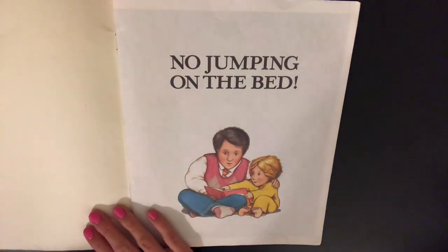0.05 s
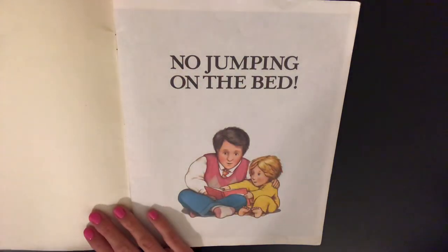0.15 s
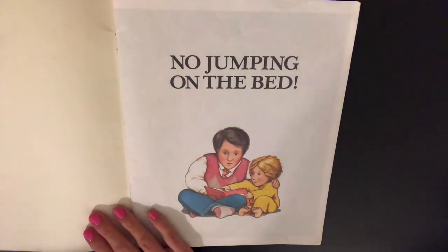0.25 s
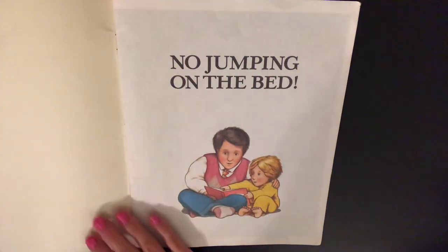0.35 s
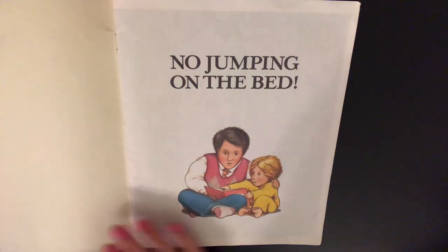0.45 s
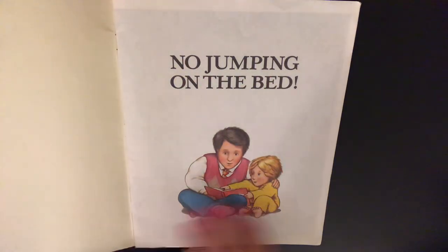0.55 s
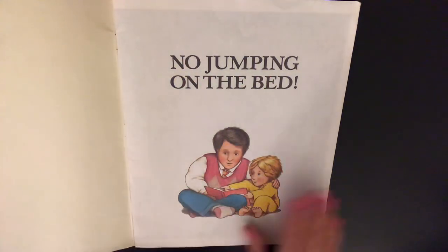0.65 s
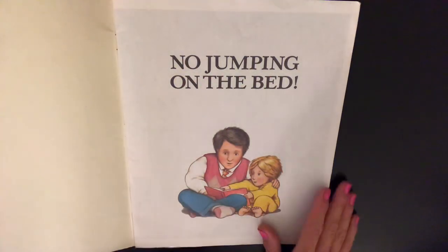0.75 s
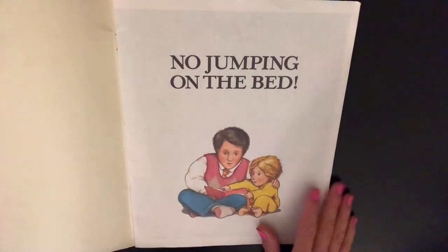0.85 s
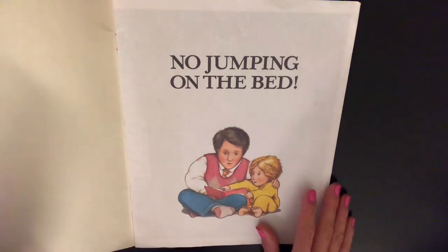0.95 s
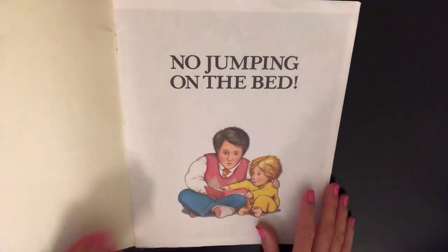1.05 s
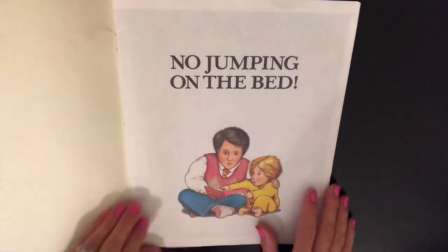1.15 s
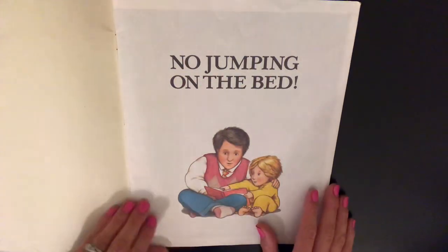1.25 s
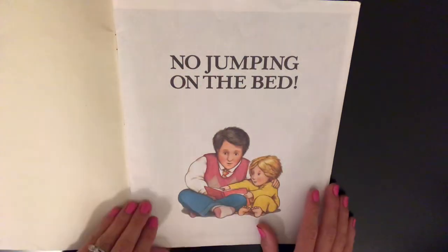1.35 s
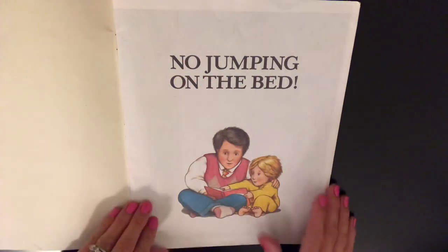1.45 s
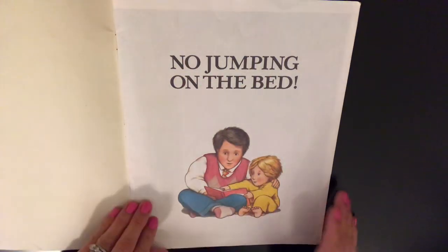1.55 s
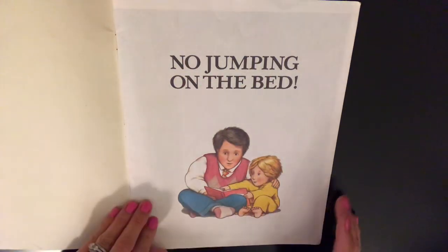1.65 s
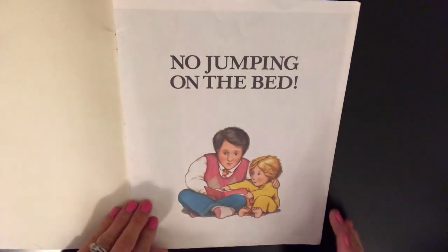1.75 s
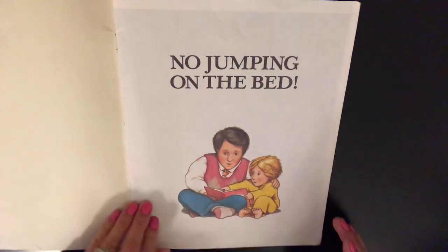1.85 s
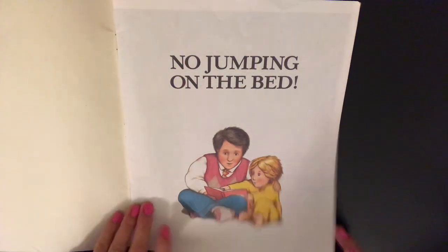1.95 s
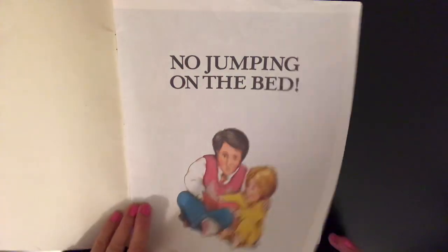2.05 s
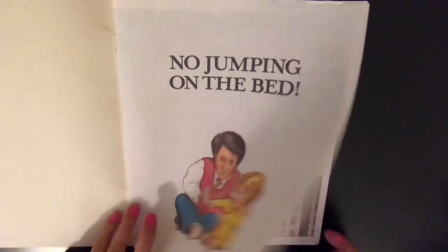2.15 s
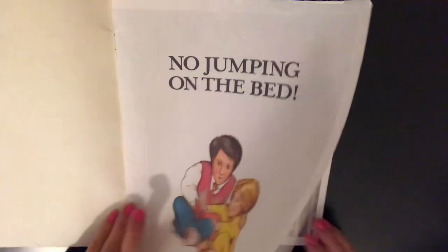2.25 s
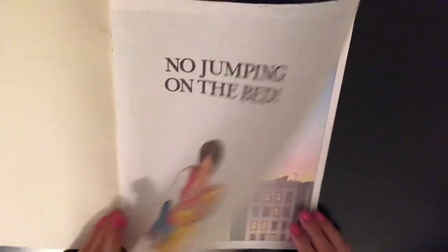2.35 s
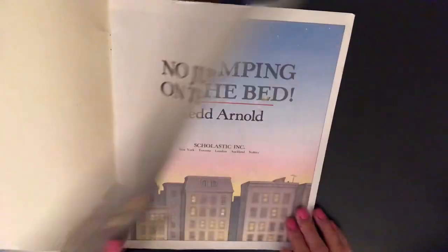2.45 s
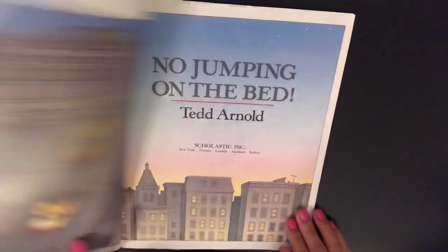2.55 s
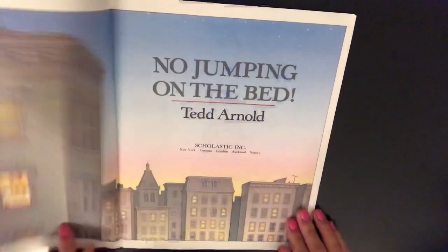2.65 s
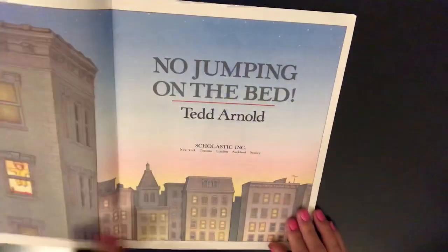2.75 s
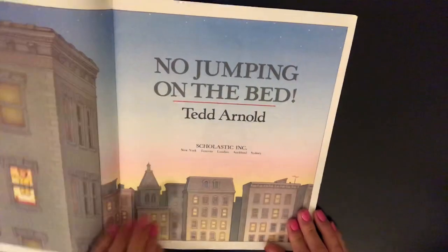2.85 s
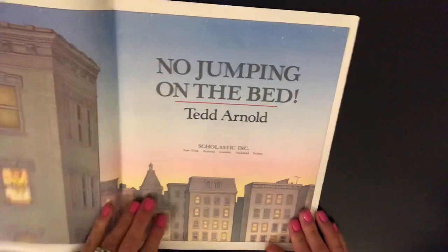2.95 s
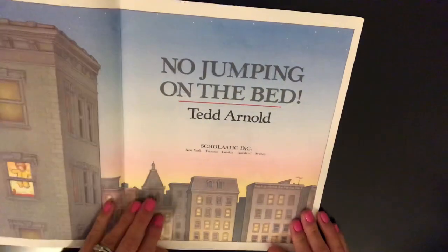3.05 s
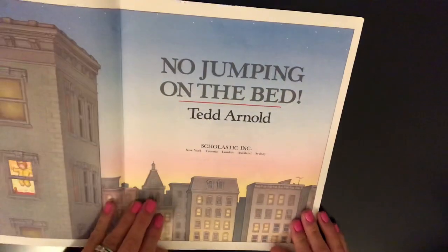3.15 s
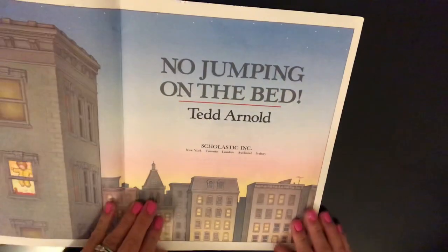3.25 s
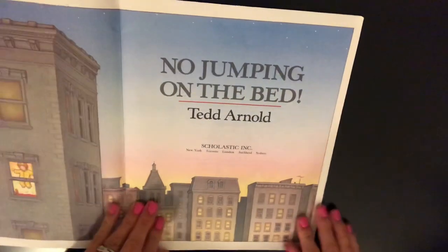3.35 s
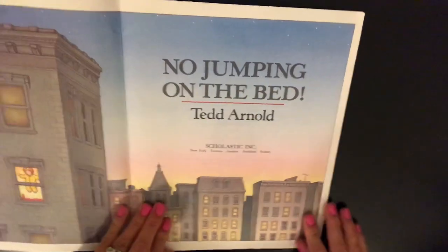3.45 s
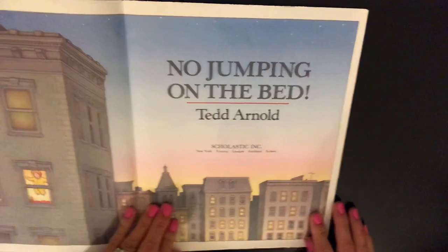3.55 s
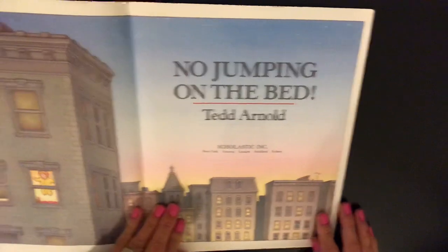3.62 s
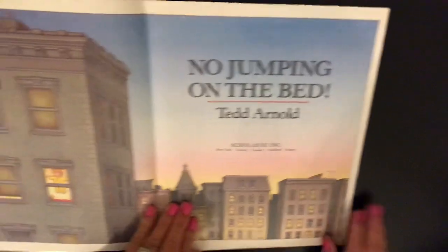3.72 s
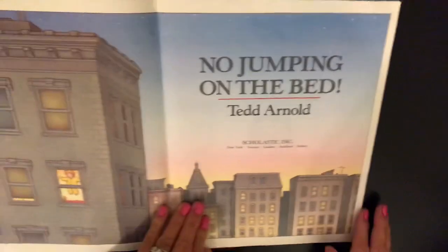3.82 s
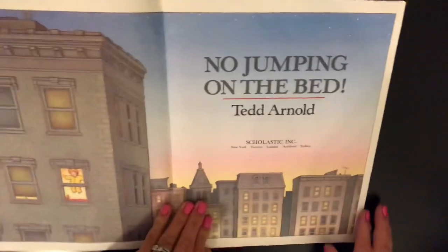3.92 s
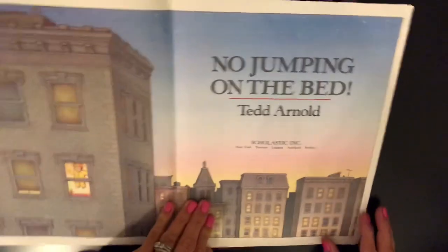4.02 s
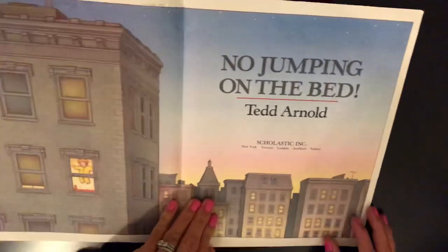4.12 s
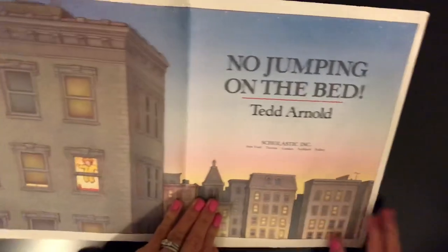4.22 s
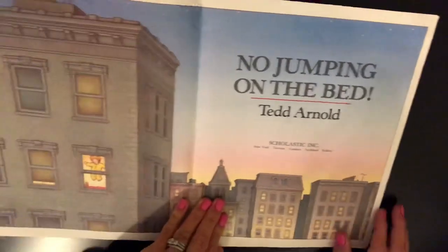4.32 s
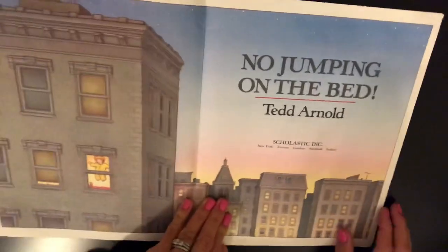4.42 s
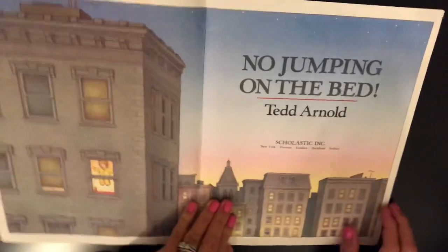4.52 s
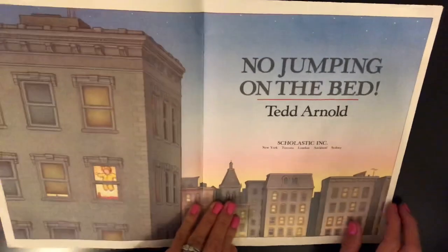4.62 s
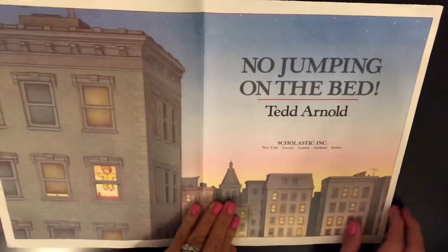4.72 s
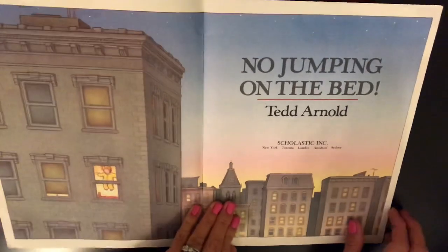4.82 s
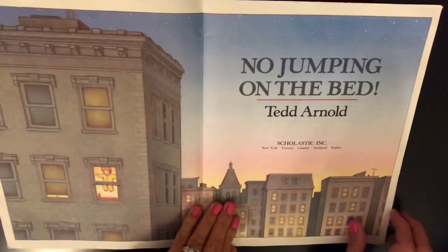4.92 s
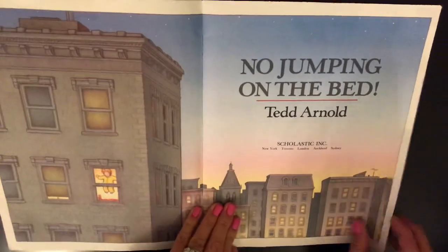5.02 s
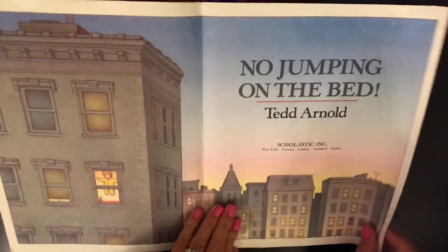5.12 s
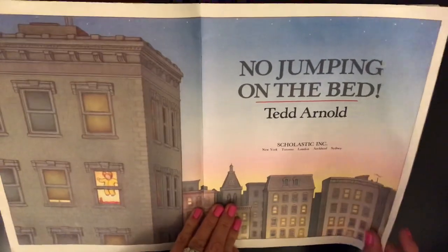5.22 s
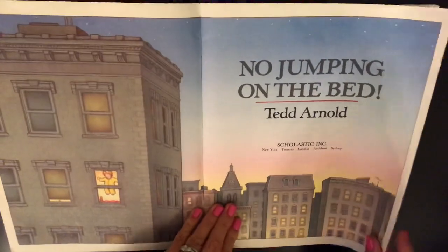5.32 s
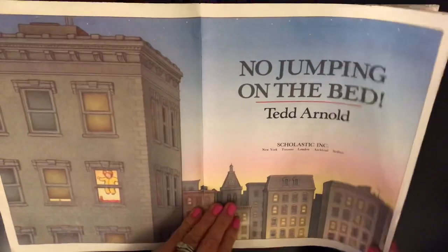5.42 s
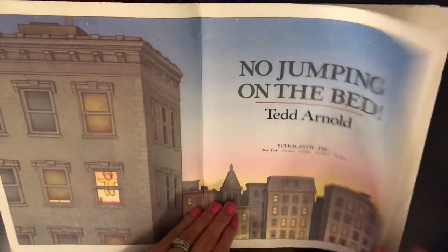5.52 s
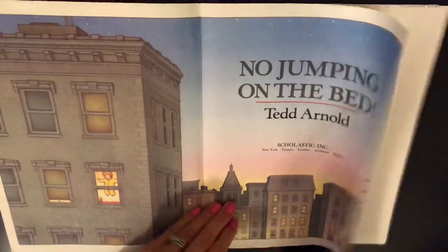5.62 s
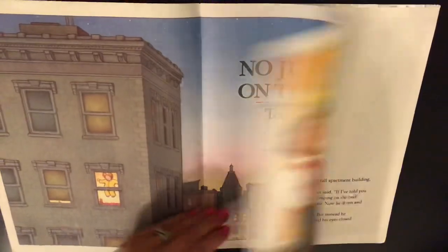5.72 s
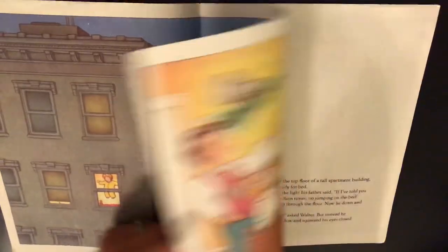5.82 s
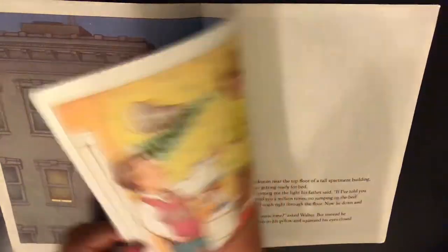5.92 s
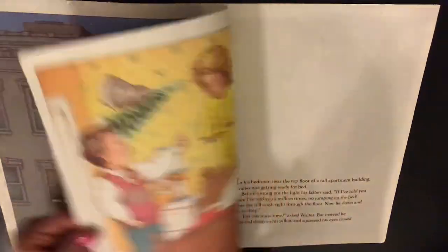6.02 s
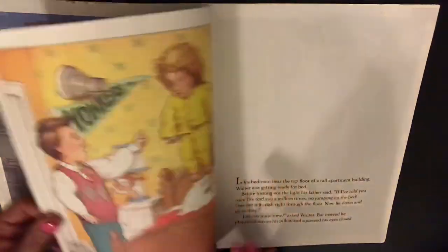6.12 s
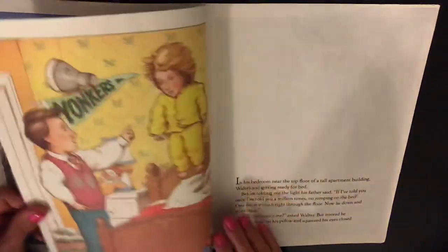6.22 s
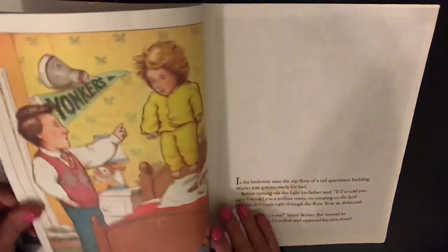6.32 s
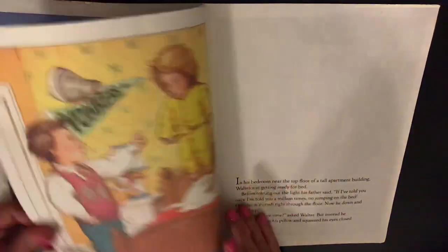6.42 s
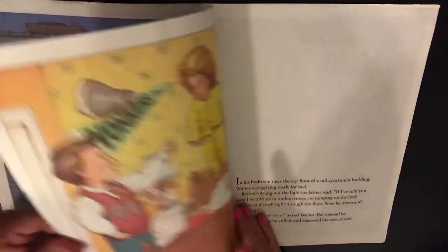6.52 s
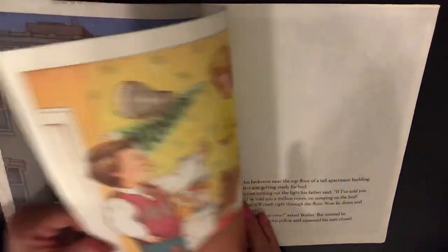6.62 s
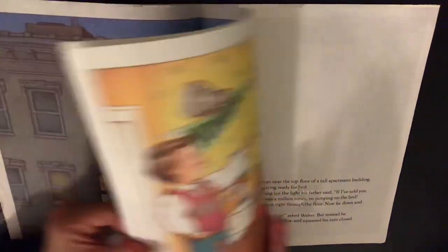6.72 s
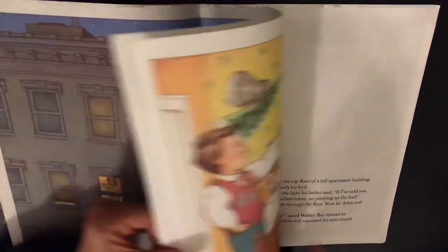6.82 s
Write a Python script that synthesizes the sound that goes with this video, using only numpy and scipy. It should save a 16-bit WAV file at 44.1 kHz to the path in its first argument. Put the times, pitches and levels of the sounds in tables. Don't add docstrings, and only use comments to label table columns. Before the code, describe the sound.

Close-up page turning in a quiet room: low table thump, papery scrapes and sliding rubs, crisp crackling folds, and a sharp final pop.

```python
import sys
import numpy as np
from scipy import signal
from scipy.fft import rfft, irfft, next_fast_len
from scipy.io import wavfile
from scipy.ndimage import uniform_filter1d, map_coordinates

SR = 44100
rng = np.random.default_rng(int(sys.argv[2]) if len(sys.argv) > 2 else 0)


def gain_from_db(level_db):
    decades = np.asarray(level_db, float) / 20
    return 10 ** decades


def store_wav(level_fs):
    pcm = np.round(np.clip(np.atleast_2d(level_fs), -1, 1) * 32767)
    wavfile.write(sys.argv[1], SR, pcm.T.astype(np.int16))


N = 302967

# f/Hz, level/dB per Hz
AIR = [(15, -52), (25, -30), (47, -6), (102, -8), (200, -14), (384, -14), (575, -24.5), (1020, -28.5),
       (2480, -32.5), (4870, -39), (5730, -37.5), (9000, -44), (14400, -45.5), (16000, -50)]
AIR_DB = -59
# f/Hz, level/dB
HUM = [(38.3, -91), (76.6, -59), (114.9, -62.5), (153.2, -71.5), (229.8, -73.5), (268, -75), (306.4, -77.5)]
HUM_SWAY_DB = 1.3
# f/Hz, time to fall 60 dB/s
WALLS = [(200, 1), (2000, 0.15), (10000, 0.26)]
# f/Hz, level/dB
MIC = [(9000, 0), (10400, -2), (11500, 1.5), (15700, 1.5), (15950, -43.5)]

# t/s, peak level/dB, f/Hz, time to fall 60 dB/s
THUMPS = [(.682, -36, 102, 0.44), (.71, -33, 64, 0.143), (.728, -30, 97, 0.1), (.69, -46.5, 184, 0.41),
          (.748, -32, 87, 0.087), (.786, -28, 87, 0.13), (.87, -38, 81.8, 0.3), (.9, -35, 84.5, .3),
          (.815, -32, 83.7, 0.11), (2.11, -49, 134, 0.54), (2.64, -48, 107.6, 0.45), (5.93, -47, 56.3, .3),
          (6.27, -48, 50.3, 0.27)]
# f/Hz, level/dB, time to fall 60 dB/s
KNOCK = [(291, 2, 0.072), (435, -16, 0.12), (675, -7, 0.15), (850, -12, 0.055), (3340, -9, 0.026)]
KNOCK_S, KNOCK_DB = .725, -38

# f/Hz, level/dB per Hz
BODY = [(400, -39), (700, -19), (1000, -4.5), (1250, -2.5), (1400, 2), (1550, -1.5), (1800, 2), (2080, -12),
        (2350, -30), (2700, -28), (3400, -57), (5700, -120)]
# f/Hz, level/dB per Hz
RUB = [(1180, -51), (2000, -5), (2150, -5.5), (2330, -1.5), (2910, -5), (4150, -4), (4820, -8), (6110, -10),
       (7500, -16.5), (9750, -63), (16500, -120)]
# f/Hz, level/dB per Hz
SIZZLE = [(4000, -10.5), (6500, 0.5), (8000, -5), (11000, -8.5), (16000, -16)]
# f/Hz, width/Hz, level/dB
COVER = [(1430, 100, 3), (2350, 130, -9), (3520, 87, -12), (5920, 940, -10.5)]
COVER_DB = -4
# peak t/s, rise/s, fall/s, paper rub level/dB, body over the rub level/dB
DRAGS = [(3.3, 0.055, 0.11, -57.5, -15), (3.44, 0.12, 0.28, -54.5, 0.5), (3.65, 0.14, 0.16, -48, -3),
         (3.77, 0.11, 0.085, -49.5, -3), (4.06, .13, .06, -54, -1), (3.85, .04, .09, -60, 3),
         (3.95, .06, .07, -63, 0), (4.15, .06, .06, -66, 2), (4.62, .04, .07, -70, 0),
         (4.03, .05, .05, -58, 0), (3.73, .04, .04, -52, 0), (4.21, 0.077, 0.141, -55, -2.5),
         (4.31, 0.11, 0.16, -55.5, -1), (4.53, 0.11, 0.089, -53, -4.5), (4.585, 0.091, 0.033, -64, 5)]
FIRST_PAGE = [(.685, 0.013, 0.13, -66.5, 0.5), (1.135, 0.014, 0.029, -70, 13), (1.18, .05, 0.32, -65, 0),
              (1.95, 0.12, .05, -71, 6), (2.078, 0.095, 0.033, -49, -6.5), (2.12, .04, 0.077, -71, 12),
              (2.2, 0.055, 0.38, -54, -2.5), (2.55, 0.17, .07, -56, -8), (2.694, 0.088, 0.15, -47, 2.5),
              (2.79, 0.1, 0.14, -57, -5), (2.988, 0.15, 0.0524, -58.5, 3)]
SECOND_PAGE = [(4.73, 0.021, 0.36, -90.5, 18), (5.07, .1, 0.14, -56, -4.5), (5.15, .05, 0.089, -59.5, -7.5),
               (5.29, 0.077, 0.094, -56, -1), (5.42, 0.14, 0.1, -39, -4.5), (5.55, .07, 0.18, -48, -9.5),
               (5.71, 0.18, 0.2, -51.5, -4), (5.86, 0.18, 0.176, -52.5, -12),
               (6.22, 0.37, 0.19, -60.5, -1.5), (6.4, 0.21, 0.155, -81, 20), (6.56, 0.068, .06, -59, 2.5),
               (6.62, 0.048, .1, -47, -9), (6.71, 0.062, .09, -47.5, -3.5), (6.8, .06, 0.11, -56.5, -5)]
EDGE_DB, LIFT_S = -12.5, 0.05
DRAG_SIZZLE_DB, FIRST_SIZZLE_DB, SECOND_SIZZLE_DB = -7.5, -4.5, -11.5

# t/s, length/s, level/dB, centre f/Hz
BRUSHES = [(1.2, .18, -67, 2200), (.76, .06, -68, 2000), (1.035, .012, -66, 3000), (2.03, .05, -54, 6000),
           (2.903, .016, -52, 4500), (4.787, .008, -64, 2500), (4.84, .03, -71, 2000),
           (6.015, .033, -52.5, 3540), (6.256, .042, -59, 6300), (6.318, .03, -61, 5500),
           (2.532, .022, -47, 2600), (6.415, .012, -52, 4200), (6.353, .012, -54.5, 4800),
           (6.405, .009, -54, 4000), (6.555, .01, -56, 4000)]
CATCHES = [(4.799, .025, -64, 2600), (2.43, .1, -60, 8000), (5.012, .03, -62, 6500),
           (6.022, .025, -61, 8000), (2.612, .012, -52, 3500), (.67, 0.064, -61, 7400),
           (.86, 0.0177, -67, 4540), (.973, 0.013, -68, 2160), (1.118, 0.081, -62.5, 4960),
           (1.815, .14, -71.5, 3430), (2.197, 0.054, -45.5, 6740), (2.29, 0.0856, -55.5, 5000),
           (4.934, .03, -69, 3500), (5.04, 0.064, -51, 4900), (5.158, 0.051, -48, 3540),
           (5.66, 0.14, -50, 4320)]
SWEEPS = [(1.25, 0.03, -66, 4600), (1.94, 0.0072, -52, 4230), (2.025, 0.063, -53, 4130),
          (2.078, 0.027, -46, 5500), (2.531, 0.024, -44, 5160), (2.198, 0.08, -47, 4580),
          (2.619, 0.011, -40.5, 3400), (2.726, .052, -40.5, 4850), (2.946, 0.12, -67.5, 3000),
          (5.115, .036, -56.5, 5400), (5.285, 0.093, -40.5, 4400), (6.572, 0.095, -44, 5650),
          (6.578, .03, -54, 5000), (6.67, 0.055, -51, 4130)]
ZIPS = [(5.355, .005, -38, 9000), (5.292, .05, -54, 9500), (5.77, .09, -64, 12000), (5.83, .05, -62, 8500),
        (5.928, .008, -60, 12500), (5.9, .08, -66, 11500), (6.256, .008, -69, 12000),
        (.085, .006, -51, 12000), (3.66, .06, -58.5, 6400), (4.2, .1, -65, 6200), (1.25, .01, -68, 11500),
        (3.187, .006, -67, 14000), (3.331, .015, -58.5, 7500), (3.41, .016, -59.5, 9500),
        (5.36, 0.09, -45, 4300), (5.39, 0.045, -42, 3000), (5.91, 0.082, -50.5, 3670),
        (5.95, 0.028, -57, 7960), (6.7245, 0.016, -29.5, 5200), (6.74, 0.028, -34, 5100),
        (6.755, 0.024, -37.5, 4100)]
WHISTLES = [
    (5.455, .06, -43, 3380),
    (6.642, 0.023, -39, 4970),
]
PUFFS = [(2.78, .05, -56, 650), (2.96, .07, -64, 650), (5.19, .06, -66, 750), (5.51, .04, -64, 650),
         (5.6, .07, -65, 750), (6.33, .03, -60, 650), (6.47, .07, -57, 600), (6.68, .04, -61, 650),
         (6.78, .06, -57, 650), (2.628, .025, -47, 780), (2.27, 0.057, -59, 300), (2.74, 0.055, -57, 330),
         (2.1, 0.045, -51.5, 230), (2.53, 0.069, -59, 400), (2.63, 0.086, -49, 415),
         (5.92, 0.16, -56.5, 410), (6.22, 0.16, -65, 706), (6.411, 0.069, -47.5, 340),
         (6.854, 0.02, -52, 318)]
SLAPS = [(.725, 0.022, -52, 500), (1.913, 0.02, -52.5, 1100), (2.13, 0.033, -42.5, 1300),
         (2.252, 0.026, -41.5, 1220), (2.56, 0.04, -51, 1330), (2.65, 0.034, -32, 1310),
         (2.69, 0.044, -52, 1270), (5.8, 0.012, -43, 1330), (5.822, 0.028, -41.5, 1190),
         (6.376, 0.1, -50.5, 890), (6.556, 0.014, -48, 900), (6.726, 0.062, -45.5, 1900),
         (6.858, .015, -42, 1000)]
FLUTTERS = [(1.948, 0.015, -37.5, 1420), (1.96, 0.014, -49, 1220), (2.275, 0.033, -44.5, 1060),
            (2.752, 0.039, -39, 1100), (2.918, 0.014, -45, 1000), (5.915, 0.04, -47, 1100),
            (5.957, 0.026, -47, 1050), (6.006, 0.041, -47, 890), (6.414, 0.015, -34, 1410),
            (6.43, 0.032, -42, 850), (6.67, 0.023, -57, 1320)]
BUCKLES = [
    (2.078, 0.031, -43, 1800),
    (2.111, 0.015, -34, 1270),
    (2.628, 0.019, -37, 1300),
    (6.6, 0.0736, -50, 650),
]
SQUEAKS = [(2.982, .022, -52, 1150), (2.535, .015, -49, 1300), (1.97, 0.033, -56, 1500),
           (3.3, .14, -66, 1400), (3.845, .05, -60, 1350), (5.19, .04, -58, 1100), (4.22, 0.11, -61, 1500),
           (4.47, 0.13, -60.5, 1500), (3.625, 0.044, -45.5, 1200), (3.665, 0.046, -49, 1510),
           (3.747, 0.021, -40, 1420), (5.428, 0.016, -40, 1500)]
BRUSH, CATCH, SWEEP = (.7, .5), (0.99, 0.29), (0.84, 0.73)
ZIP, WHISTLE, PUFF = (0.32, 0.3), (0.46, 0.84), (0.26, 0.38)
SLAP, FLUTTER, BUCKLE, SQUEAK = (0.91, 0.042), (0.49, 0.58), (0.67, 0.79), (0.14, 0.57)
SCRAPE_COMB_DB = 3.2

# t/s, peak level/dB, ring f/Hz, ring length/cycles
SNAPS = [(.722, -35, 830, 0.69), (1.119, -44, 1630, 2.1), (1.638, -42, 1550, 1.4), (.0856, -47, 1300, .8),
         (2.626, -35, 1230, 1.3), (2.765, -26.5, 1160, 2.4), (2.904, -36, 1110, 1.2),
         (3.2632, -22, 1690, 2), (3.2638, -21, 1450, 1.1), (3.2631, -30, 4200, .9),
         (6.855, -16.5, 935, 0.51)]
TICKS = [
    (.0854, -29, 5930, 1),
    (1.496, -55, 4320, 2.2),
    (1.9624, -34, 2670, 1.5),
    (2.2497, -21, 3650, 0.9),
    (2.6247, -25.5, 3200, 0.99),
    (1.639, -49, 5500, 1.5),
    (5.4076, -28, 3740, 1.7),
    (5.5005, -35, 2880, 2.8),
]
REBOUND = [
    (5.3551, -2, 3700, .8),
    (5.35668, -1.5, 2900, .6),
    (5.3556, -15, 1500, .9),
    (6.8547, -25, 1500, 1.1),
]
CRACKLE = [
    (2.147, -33.5, 1537, 1.8),
    (2.284, -32, 1700, 1.6),
    (2.632, -28, 1230, 1.2),
    (2.6415, -24, 1200, .8),
    (2.655, -18, 1020, .84),
    (2.6645, -24, 1243, 1.2),
    (3.751, -37, 1390, 1.1),
    (5.527, -36, 2810, 1.24),
]
MUFFLED = [(2.2525, -28.5, 2700, 1.1), (1.9515, -31.5, 1246, 1.9), (2.1165, -21, 1110, .8),
           (2.65, -21, 1200, 1.1), (2.9175, -29, 1500, 0.62), (5.8217, -27, 1240, 1.1),
           (6.014, -35, 1340, 2.1), (6.558, -37, 800, 0.84), (2.9178, -26.5, 3530, 1.3),
           (5.505, -35, 1100, 0.4), (5.637, -29, 1430, 0.38), (5.7985, -16.5, 1320, 0.66),
           (6.3745, -29.5, 800, 0.42), (6.3742, -28.5, 2730, 0.64), (6.4158, -22, 1900, 0.49),
           (6.4212, -19, 850, 0.64), (6.727, -33.5, 600, 0.42), (6.44, -39, 800, 2),
           (6.4513, -37, 774, 1.1)]
PINGS = [
    (.284, -44, 1610, 1.6),
    (5.556, -33, 2650, 4),
    (6.179, -48, 1760, 5.1),
]
# t/s, peak level/dB, ring f/Hz
FOLDS = [(1.9665, -36, 1300), (2.1035, -34.5, 600), (2.2805, -37.5, 454), (2.123, -32, 1050),
         (5.8222, -28, 2400), (6.408, -38, 895), (6.4162, -29, 3500), (6.4195, -29, 2700),
         (2.0975, -37, 1400), (2.1195, -24, 1520), (2.136, -30, 1090), (2.6685, -25, 1360),
         (2.672, -28, 1120), (2.678, -33, 1460), (2.6885, -36, 1600), (2.6935, -33, 950),
         (2.7095, -32, 1700), (2.752, -33, 1120), (2.761, -30, 970), (2.773, -34, 1050), (2.7775, -31, 970),
         (5.8265, -29, 1740), (5.8315, -36, 820), (5.9233, -37, 1310), (5.926, -39, 1400),
         (5.929, -36, 836), (5.94, -43, 1090), (5.947, -32, 1270), (5.9605, -40, 790), (5.965, -33, 730),
         (5.9822, -39, 686), (6.0115, -36, 730), (6.023, -35.5, 614), (6.05, -40, 775), (6.381, -37, 795),
         (6.392, -32, 840), (6.3995, -35, 730), (6.4175, -25, 1530), (6.425, -26, 2100), (6.4275, -28, 930),
         (6.4345, -30, 800), (6.4375, -32, 1120), (6.4455, -32, 1090), (6.448, -28, 745),
         (6.5565, -32, 664)]
FIBRES = [(2.652, -20, 3420), (2.6573, -26, 2400), (2.6658, -27, 2370), (2.7462, -28, 2840),
          (2.7623, -35, 4590), (5.3055, -35, 3700), (5.3266, -29, 5860), (5.3225, -29, 3800),
          (5.332, -29, 2300), (5.3458, -26, 3660), (5.3666, -30, 4400), (5.3769, -29, 3040),
          (5.3838, -26, 4200), (5.3998, -28, 4330), (5.417, -31, 3360), (5.4208, -28, 3015),
          (5.4747, -31, 3015), (5.4843, -30, 2900), (5.5094, -33, 4090)]
# (overtone/dB, crack/dB) under its ring
SNAP, TICK, CRACKLING = (-16.5, -26.5), (-22.5, -18.5), (-20.5, -29.5)
MUFFLE, PING = (-22.5, -56), (-32, -56)
DRY_SNAP = (-25, -27)
FOLD, FIBRE = (0.97, -39.5, -55), (1.2, -16, -33)  # (ring length/cycles, overtone/dB, crack/dB)
FOLD_LAGS, CRACK_LAGS = 0.31, 0.44


def unit(x):
    return x / np.sqrt(np.mean(x ** 2) + 1e-20)


def along(points, hz):
    f, v = np.transpose(points)
    return np.interp(np.log(hz + 1), np.log(f + 1), v)


def wobble(rate, size=N):
    knots = rng.standard_normal(int(size * rate / SR) + 4)
    return map_coordinates(knots, [np.arange(size) * rate / SR])


def filtered(x, response):
    m = next_fast_len(len(x) + 4096)
    return irfft(rfft(x, m) * response(np.fft.rfftfreq(m, 1 / SR)), m)[:len(x)]


def kinds(*pairs):
    return [(*row, *shared) for rows, shared in pairs for row in rows]


def rustle(spectrum, patchy_db, grain_db):
    grains = rng.standard_normal(N) * gain_from_db(grain_db * wobble(400))
    z = signal.stft(grains, nperseg=256)[2]
    field = uniform_filter1d(rng.standard_normal(z.shape), 3, axis=0)
    field = uniform_filter1d(field, 10, axis=1)
    patchy = signal.istft(z * gain_from_db(patchy_db * unit(field)), nperseg=256)[1][:N]
    return unit(filtered(patchy, lambda hz: gain_from_db(along(spectrum, hz))))


def room_noise():
    t = np.arange(N) / SR
    drift = .5 * wobble(3.05)
    hum = np.zeros(N)
    for hz, db in HUM:
        level = gain_from_db(db + HUM_SWAY_DB * wobble(8.4)) * np.sqrt(2)
        hum += level * np.sin(2 * np.pi * hz * t + drift + rng.uniform(0, 5.47))
    return hum + gain_from_db(AIR_DB) * rustle(AIR, patchy_db=-1.7, grain_db=1.33)


def walls(x):
    hz, t, z = signal.stft(rng.standard_normal(SR // 3), SR, nperseg=128)
    fade = gain_from_db(-60 * t / along(WALLS, hz)[:, None])
    tail = signal.istft(z * fade, SR, nperseg=128)[1]
    late = np.pad(x, (60, 0))
    return signal.fftconvolve(late, tail / np.linalg.norm(tail))[:N]


def table():
    age = np.arange(SR // 2) / SR
    hits = THUMPS + [(KNOCK_S, KNOCK_DB + db, hz, t60) for hz, db, t60 in KNOCK]
    out = np.zeros(N)
    for s, db, hz, t60 in hits:
        soft_start = 1 - np.exp(-age * hz * 3.1)
        ring = gain_from_db(db - 60 * age / t60) * soft_start * np.sin(2 * np.pi * hz * age)
        start = round(s * SR)
        out[start:][:len(age)] += ring[:N - start]
    return out


def pressed(rows):
    t, power = np.arange(N) / SR, np.zeros((2, N))
    for s, rise, fall, db, body_db in rows:
        times = [-rise - LIFT_S, -rise, 0, fall, fall + LIFT_S]
        swell_db = np.interp(t - s, times, [-90, EDGE_DB, 0, EDGE_DB, -90])
        power += gain_from_db(2 * (swell_db + db)) * gain_from_db([[0], [2 * body_db]])
    return power


def cover_ring():
    def rings(f):
        return sum(gain_from_db(db) / (1 + (2 * (f - hz) / width) ** 2) for hz, width, db in COVER)
    return unit(filtered(rng.standard_normal(N), rings))


def sliding():
    drag, first, second = pressed(DRAGS), pressed(FIRST_PAGE), pressed(SECOND_PAGE)
    rub_gain, body_gain = np.sqrt(drag + first + second)
    sizzle_power = gain_from_db(2 * DRAG_SIZZLE_DB) * drag[0] + gain_from_db(2 * FIRST_SIZZLE_DB) * first[0]
    sizzle_power += gain_from_db(2 * SECOND_SIZZLE_DB) * second[0]
    pressure = gain_from_db(.7 * wobble(25))
    body = body_gain * rustle(BODY, patchy_db=1.2, grain_db=1.2)
    rub = rub_gain * rustle(RUB, patchy_db=2.4, grain_db=.6)
    cover = gain_from_db(COVER_DB) * np.sqrt(drag[0]) * cover_ring()
    sizzle = np.sqrt(sizzle_power) * rustle(SIZZLE, patchy_db=2.5, grain_db=-1.5)
    return pressure * (body + rub + cover + sizzle)


def strokes(rows, top_hz, lump_db, lump_rate, below, above, rise, start_db, end_db, uneven_db):
    out, t = np.zeros(N + SR), np.arange(SR // 5) / SR
    for s, length, db, hz, spread, peak in rows:
        lumps = gain_from_db(lump_db * wobble(lump_rate, size=len(t)))
        comb_db = uneven_db * rng.standard_normal(100)

        def colour(f):
            octaves = np.log2((f + 1) / hz) / spread
            steepness = np.where(f < hz, below, above)
            skirts = (1 + octaves ** 2) ** -steepness / np.sqrt(f + 50)
            comb = gain_from_db(np.interp(f, np.arange(100) * 230, comb_db))
            return skirts * comb / (1 + (f / top_hz) ** 4)

        top = np.clip(peak, .05, .95)
        times = [0, rise * top, top, 1, 1.4, 1.7]
        shape_db = np.interp(t / length, times, [-30, start_db, 0, end_db, -30, -90])
        burst = unit(filtered(gain_from_db(shape_db) * lumps * rng.standard_normal(len(t)), colour))
        out[round(s * SR):][:len(t)] += gain_from_db(db) * np.sqrt(length * SR / len(t)) * burst
    return out[:N]


def brushes():
    return strokes(kinds((BRUSHES, BRUSH)), top_hz=7500, lump_db=1.5, lump_rate=250, below=.8, above=1.5,
                   rise=.3, start_db=-3, end_db=-6, uneven_db=SCRAPE_COMB_DB)


def scrapes():
    rows = kinds((CATCHES, CATCH), (SWEEPS, SWEEP), (ZIPS, ZIP), (WHISTLES, WHISTLE))
    return strokes(rows, top_hz=15100, lump_db=1.5, lump_rate=273.0, below=1.03, above=0.73,
                   rise=0.33, start_db=-3.0, end_db=-9.5, uneven_db=SCRAPE_COMB_DB)


def flaps():
    rows = kinds((SLAPS, SLAP), (FLUTTERS, FLUTTER), (BUCKLES, BUCKLE), (SQUEAKS, SQUEAK), (PUFFS, PUFF))
    return strokes(rows, top_hz=3400, lump_db=2.6, lump_rate=315, below=0.93, above=0.62,
                   rise=0.18, start_db=-2.0, end_db=-10.5, uneven_db=2)


def snaps():
    out, t = np.zeros(N + SR), np.arange(SR // 40) / SR
    pops = kinds((SNAPS, SNAP), (TICKS, TICK), (CRACKLE, CRACKLING), (REBOUND, DRY_SNAP),
                 (MUFFLED, MUFFLE), (PINGS, PING), (FOLDS, FOLD), (FIBRES, FIBRE))

    def fold_colour(f):
        return np.exp(-np.log2((f + 1) / 2800) ** 2 / 0.76)

    def crack_colour(f):
        return 1 / (1 + (5500 / (f + 1)) ** 6) / (1 + (f / 11000) ** 4)

    for s, db, hz, turns, fold_db, crack_db in pops:
        fold_db = fold_db - FOLD_LAGS * (db + 29.5)
        crack_db = crack_db - CRACK_LAGS * (db + 28.5)
        u = t * hz / turns
        ring = u * np.exp(1 - u) * np.sin(2 * np.pi * hz * t)
        noise = rng.standard_normal((2, len(t))) * (1 - np.exp(-t / .0004))
        fold = unit(filtered(noise[0] * gain_from_db(-60 * t / 0.024), fold_colour))
        crack = unit(filtered(noise[1] * gain_from_db(-60 * t / 0.027), crack_colour))
        pop = ring + gain_from_db(fold_db - 4) * fold + gain_from_db(crack_db - 7.5) * crack
        out[round(s * SR):][:len(t)] += gain_from_db(db - 2.0) * pop
    return out[:N]


def scene():
    paper = brushes() + scrapes() + flaps() + snaps()
    return (room_noise() + gain_from_db(-16) * walls(paper) + table() + sliding() + paper)[None]


def top_cut(x):
    return signal.sosfilt(signal.butter(12, 16660, fs=SR, output="sos"), x)


def record(dry):
    heard = filtered(dry[0], lambda hz: gain_from_db(along(MIC, hz)))
    return top_cut(heard[None])


dry = scene()
out = record(dry)
store_wav(out)
```